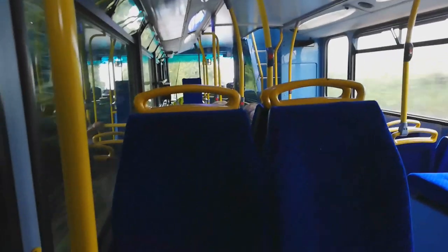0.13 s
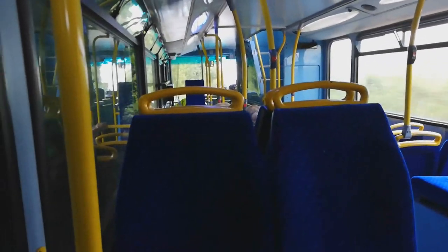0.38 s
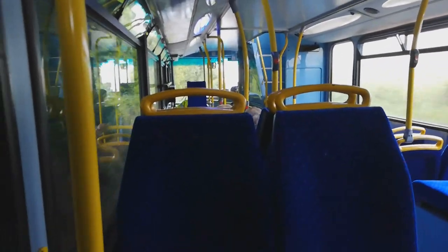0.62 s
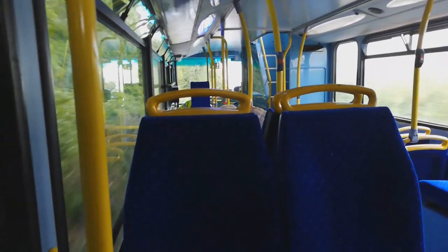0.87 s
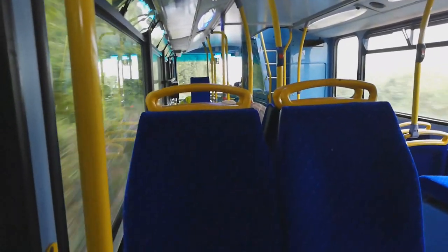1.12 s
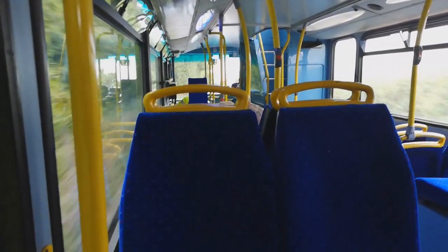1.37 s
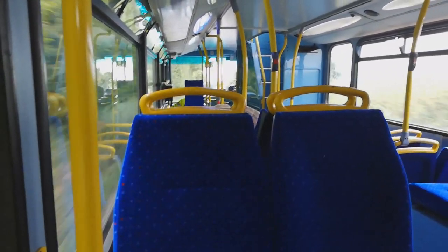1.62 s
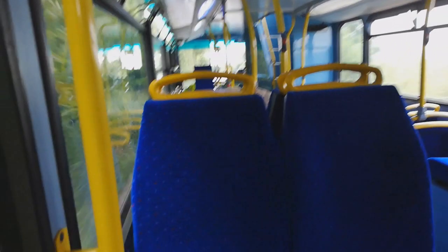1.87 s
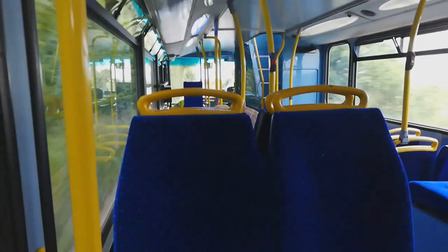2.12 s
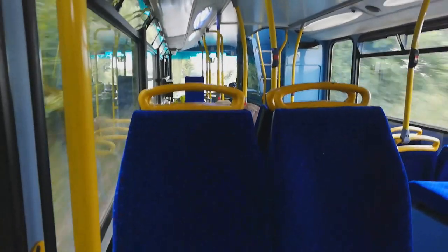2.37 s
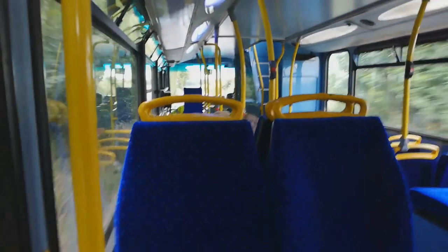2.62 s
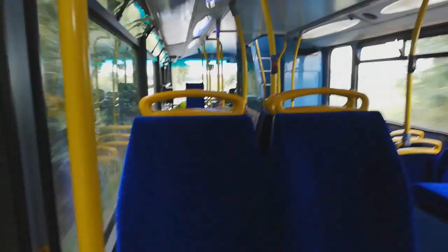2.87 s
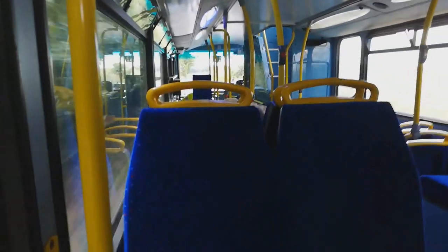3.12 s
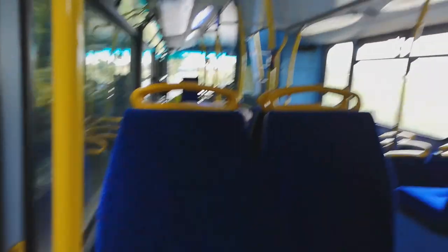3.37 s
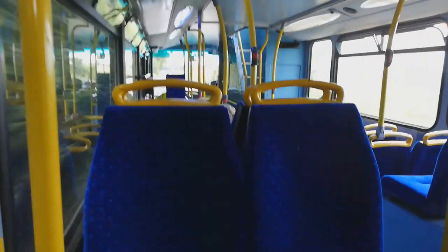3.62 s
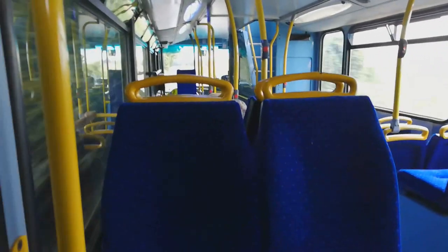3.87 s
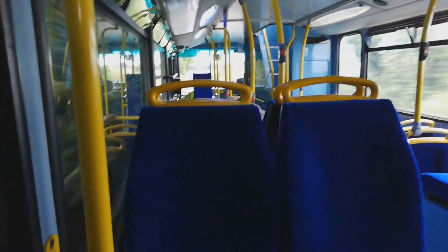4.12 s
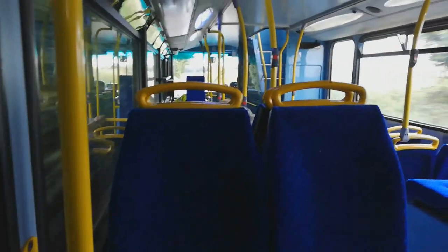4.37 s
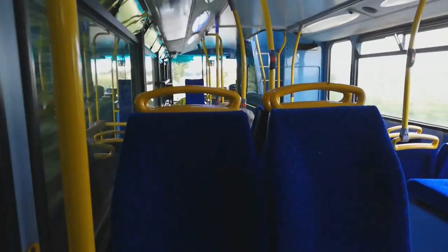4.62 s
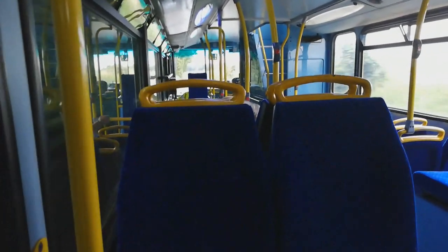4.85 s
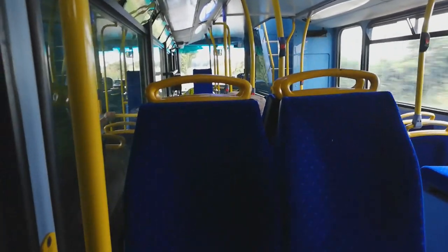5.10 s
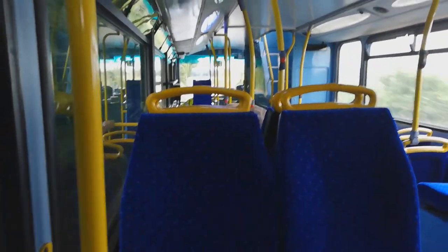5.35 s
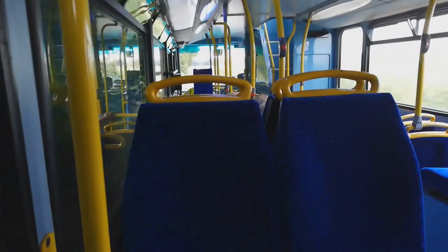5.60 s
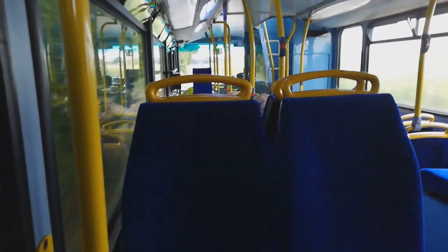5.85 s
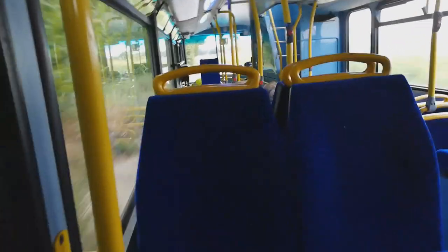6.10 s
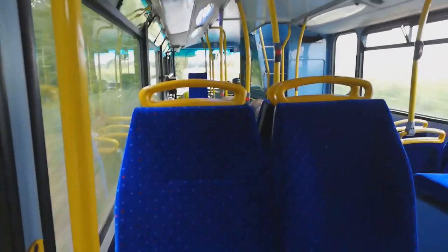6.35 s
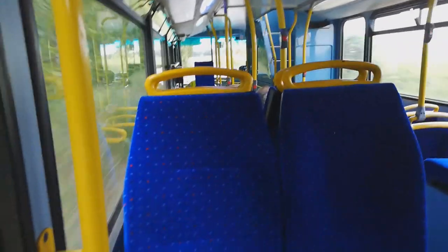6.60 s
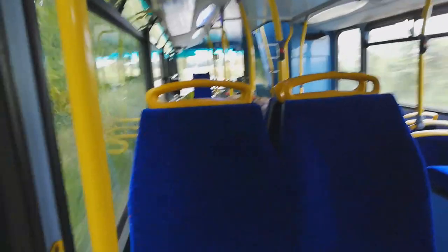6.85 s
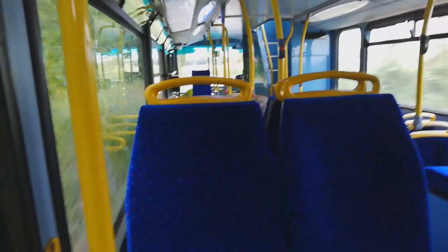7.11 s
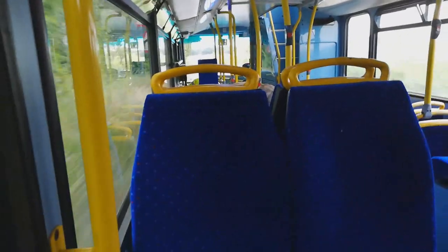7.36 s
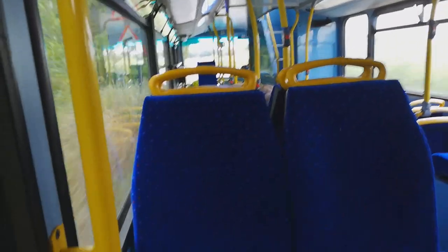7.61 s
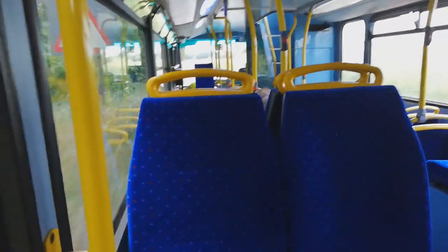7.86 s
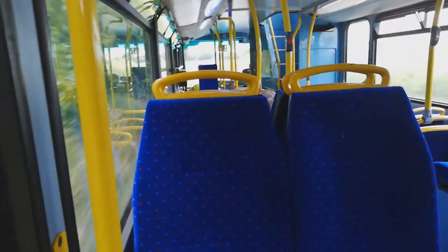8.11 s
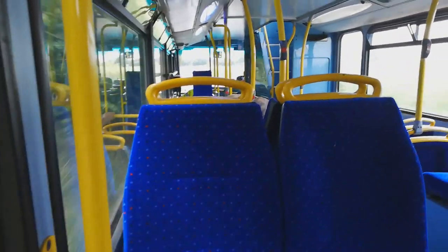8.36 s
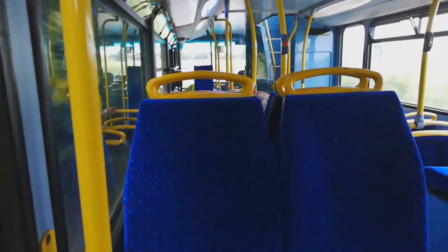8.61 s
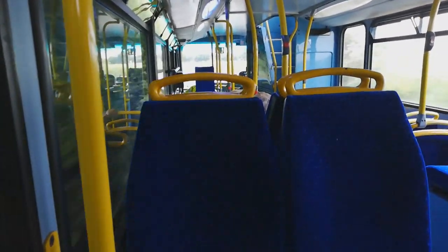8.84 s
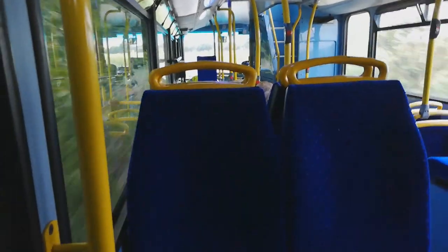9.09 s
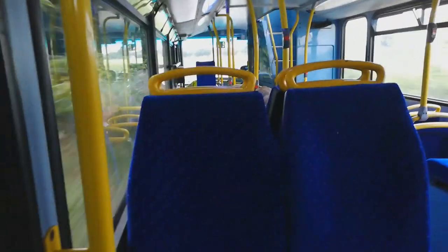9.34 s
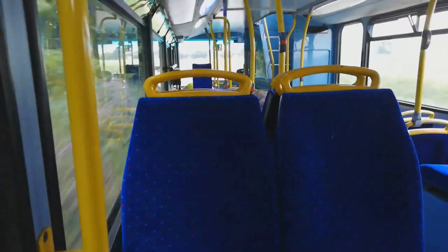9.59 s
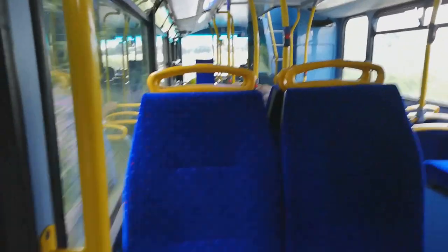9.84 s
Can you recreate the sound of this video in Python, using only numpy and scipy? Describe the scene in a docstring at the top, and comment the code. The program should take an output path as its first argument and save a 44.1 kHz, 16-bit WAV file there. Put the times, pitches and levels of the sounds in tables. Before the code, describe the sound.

Heard from a seat inside a bus at speed on a country road: deep engine drone, a fan hum and heavy low rumble dominate, with softer tyre roar and wind. Loose trim chatters in short dry spells, mostly on the right. Halfway, the engine eases off, bumps grow stronger, and a thin airy whistle opens near seven seconds and stays. Close stereo pickup.

```python
"""Bus interior at speed

Inside a bus on a country road, heard at two points a hand apart. Engine, gears and fan are sines on
multiples of their speeds, over shaped noise for body rumble, tyre roar and wind. Loose trim, as struck
ringing modes, chatters mostly on the right; brief noise bursts tick. Late on, noise through close
resonances whistles as an air leak and a narrow whirr comes up."""
import sys
import numpy as np
from scipy import signal
from scipy.io import wavfile
from scipy.ndimage import uniform_filter1d

SR = 44100
rng = np.random.default_rng(int(sys.argv[2]) if len(sys.argv) > 2 else 0)


def to_wav(s):
    """Save 16-bit WAV."""
    ch = np.atleast_2d(s).T  # columns
    pcm = np.round(np.clip(ch, -1, 1) * 32767)  # PCM
    wavfile.write(sys.argv[1], SR, pcm.astype(np.int16))


def how_loud(loudness_db):
    """Turn decibels into a plain amplitude multiplier (0 dB gives 1, 20 dB gives 10)."""
    steps = np.asarray(loudness_db, float) / 20
    return 10 ** steps


N = 439677
LOW_STEP = 10  # low sounds are made at a tenth of the sample rate

# likeness of left and right: f/Hz, likeness (0 to 1)
LIKENESS = [(100, 0.99), (230, 0.94), (300, 0.25), (600, 0.16), (1500, .25), (2300, 0.53), (4000, 0.29),
            (5000, 0.066), (6600, .3), (7500, .08)]
# bumps that shake the trim: t/s, initial drive level/dB
BUMPS = [(1.1832, -43), (1.6896, -44), (2.5925, -42), (3.3847, -41), (4.0377, -40), (5.6725, -35.5),
         (6.0831, -43), (6.1539, -34.5), (6.2243, -42), (6.6097, -37), (6.9277, -38), (7.0575, -35.5),
         (7.15, -38.5), (7.9478, -42), (8.116, -51), (8.4426, -39), (8.6242, -39), (8.6981, -43),
         (8.879, -39), (9.0648, -43), (9.3859, -43), (9.4574, -37), (9.5256, -40), (9.7477, -42)]


def evened(x):
    """Scales to rms 1."""
    return x / np.sqrt(np.mean(x ** 2) + 1e-20)


def times(step=1):
    """Time axis in s, one point every step samples."""
    return np.arange(0, N, step) / SR


def read(points, hz):
    """Interpolates table columns over log frequency."""
    f, *values = np.transpose(points)
    return np.array([np.interp(np.log(hz + 1), np.log(f + 1), v) for v in values])


def curves(rows, step=1):
    """Interpolates table columns over time."""
    s, *columns = np.transpose(rows)
    return [np.interp(times(step), s, c) for c in columns]


def drift(rate_hz, count, step=1):
    """Slow random curves of rms 1, one a row: sines up to rate_hz, weaker towards the top."""
    s = np.arange(N // 512 + 2) * 512 / SR
    f = np.geomspace(rate_hz / 10, rate_hz, 16)
    phase = 2 * np.pi * (f[:, None] * s + rng.random((count, 16, 1)))
    total = (np.sin(phase) / np.sqrt(f[:, None])).sum(1)
    return np.array([np.interp(times(step), s, evened(row)) for row in total])


def noise(spectrum, size, patchy_db, step=1):
    """Two-channel noise from random short-time spectra, patchy in time and pitch; mean of both has rms 1."""
    # phase between the sides: f/Hz, lead of left/rad
    left_lead = [(0, 0), (340, 0.0), (780, -5), (1380, -6), (3100, -12), (4050, -15), (5940, -18),
                 (7150, -11), (10500, -18.5), (12300, -14), (14300, -33), (15300, -33)]
    hz = np.fft.rfftfreq(size, step / SR)
    frames = N // step // (size // 4) + 5
    a, b, c, d, patches = rng.standard_normal((frames, len(hz), 5)).T
    patches = uniform_filter1d(patches, size=9, axis=0)
    patches = evened(uniform_filter1d(patches, size=9, axis=1))
    same = np.clip(read(LIKENESS, hz)[0], 0, 1)[:, None]
    turn = np.exp(-1j * np.interp(hz, *np.transpose(left_lead)))[:, None]
    left = a + 1j * b
    right = same * turn * left + np.sqrt(1 - same ** 2) * (c + 1j * d)
    z = np.array([left, right]) * how_loud(read(spectrum, hz)[:, :, None] + patchy_db * patches)
    pair = signal.istft(z, nperseg=size, noverlap=size - size // 4)[1][:, :len(times(step))]
    return pair / np.sqrt(np.mean(pair.mean(0) ** 2))


def orders(hz, multiples, levels, change_db):
    """Sines on multiples of a base rate; cabin reflections make them waver, unlike at each side."""
    turns, out = np.cumsum(hz) * LOW_STEP / SR, 0
    for k, (db, share, waver_db) in zip(multiples, levels):
        both, *sides = drift(1.5, count=3, step=LOW_STEP)
        apart = np.sqrt(1 - np.clip(read(LIKENESS, k * hz.mean())[0], 0, 1) ** 2)
        waver = (1 - apart) * both + apart * np.array(sides)
        # each side's phase wavers with the other side's level curve
        phase = 2 * np.pi * (k * turns + rng.random()) + 0.23 * waver_db * waver[::-1]
        level_db = db + share * change_db + waver_db * waver
        out = out + np.sqrt(2) * how_loud(level_db) * np.sin(phase)
    return out


def driveline():
    """Firing orders follow the load, gear teeth whine, and the fan keeps its own speed."""
    # t/s, engine firing rate/Hz, engine load/dB, fan tone/Hz, fan tone level/dB
    drive = [(0.0, 51.42, -2.5, 208.0, -20), (0.71, 50.92, -0.5, 208, -21.5),
             (1.42, 51.47, 2, 208.4, -20.5), (2.14, 52.04, 0, 207.8, -21), (2.85, 52.9, -1, 209.3, -20.5),
             (3.56, 54.1, -0.5, 210.1, -20.5), (4.35, 55.75, 0, 210.7, -22.5),
             (4.99, 56.55, -8.5, 213.7, -23), (5.7, 57, -10.5, 220.4, -26),
             (6.41, 56.36, -14.5, 219.5, -29), (7.12, 56.5, -18, 221, -29.5),
             (7.83, 56.65, -17, 223.3, -30.5), (8.55, 55.7, -15, 222.5, -29.5),
             (9.26, 54.6, -15.5, 221.3, -30.5), (9.97, 54.84, -10.5, 222.5, -29.5)]
    # multiples of the firing rate; one row each: rms level at 0 dB load/dB, share of load change, waver/dB
    engine_orders = (1, 2, 4.272, 6.43, 6.83, 21.4)
    engine_levels = [(-18.5, 0.85, 0), (-20, 0.66, .5), (-33.5, -0.056, 1), (-48, -0.13, 2.5),
                     (-49.5, -0.19, 2), (-54.5, 0.87, 3.5)]
    # multiples of the fan tone; one row each: level over first fan level/dB, share of its change, waver/dB
    fan_orders = (1, 1.372, 2, 2.72, 5.5)
    fan_levels = [(0, 0.96, 0.24), (-26, 0.54, 2), (-37.5, -0.67, 4), (-36, 0.3, 4), (-44, -0.8, 4)]
    # tooth-mesh multiples of the firing rate
    mesh_orders = (11.42, 12.81, 15.42, 16.43)
    # whines swell and fade gliding through cabin resonances: t/s, rms level of each mesh order/dB
    mesh_levels = [(0, -64, -56, -57, -42.5), (.7, -64, -48, -55, -46.5), (1.4, -60, -67, -58, -51),
                   (2.5, -60, -60, -46, -46), (3.5, -64, -48, -60, -50), (5, -61, -52, -63, -47),
                   (5.75, -62, -46.5, -63, -48), (6.2, -70, -52, -61, -62), (7.8, -52, -48, -67, -62),
                   (9.97, -50.5, -49.5, -64, -54)]
    firing_hz, load_db, fan_hz, fan_db = curves(drive, LOW_STEP)
    engine = orders(firing_hz, engine_orders, engine_levels, load_db)
    fan = how_loud(fan_db[0]) * orders(fan_hz, fan_orders, fan_levels, fan_db - fan_db[0])
    gears = sum(orders(firing_hz, [k], [(0, 1, 2.9)], db)
                for k, db in zip(mesh_orders, curves(mesh_levels, LOW_STEP)))
    return engine + fan + gears


def turbo():
    """A faint thin whine: one sine with trembling pitch and unsteady level at each side."""
    # t/s, f/Hz, level/dB
    whine = [(0, 9720, -54), (.2, 9720, -63), (.3, 9220, -85), (.6, 9100, -70), (2, 9060, -65),
             (3, 9210, -63), (4, 9300, -64), (4.6, 9300, -80)]
    hz, db = curves(whine)
    tremble_hz = 12 * drift(30, count=1)
    return how_loud(db + 3.3 * drift(6, count=2)) * np.sin(2 * np.pi * np.cumsum(hz + tremble_hz) / SR)


def body():
    """The road shakes the springs, a cabin resonance and the floor panels: three low noises."""
    # t/s, body heave/dB, cabin boom/dB, rumble/dB
    road = [(0, -16.5, -22, -22), (.5, -17.5, -21, -22.5), (2, -24.5, -18.5, -21), (4.4, -22.5, -20, -22),
            (5.1, -21.5, -21, -20.5), (5.5, -20.5, -30, -22), (6, -13.5, -26, -21.5),
            (6.6, -18, -20.5, -20.5), (7.3, -21, -24.5, -22.5), (7.8, -21.5, -30, -24.5),
            (9, -22.5, -30.5, -22.5), (9.97, -19.5, -33, -23)]
    # noise spectra: f/Hz, relative level/dB
    heave_spectrum = [(3, -35), (7, -17), (12, -0.5), (18, -5), (26, -6), (38, -10.5), (50, -10), (65, -50),
                      (120, -130)]
    boom_spectrum = [(40, -51), (62, -15.5), (76, -8), (81, 3), (86, -7), (98, -14), (130, -50),
                     (200, -130)]
    rumble_spectrum = [(30, -27), (60, -3.5), (105, 2), (130, -3), (158, 0), (184, -9), (205, 1),
                       (235, -6.5), (252, -9), (272, -24.5), (330, -57), (500, -130)]
    # the uneven road makes the three come and go: heave/dB, boom/dB, rumble/dB
    lurch_depth_db = (2, 2, 0.93)
    lurch_db = np.array(lurch_depth_db)[:, None] * drift(4, count=3, step=LOW_STEP)
    heave_db, boom_db, rumble_db = curves(road, LOW_STEP) + lurch_db
    heave = how_loud(heave_db) * noise(heave_spectrum, size=2048, patchy_db=1.0, step=LOW_STEP)
    boom = how_loud(boom_db) * noise(boom_spectrum, size=2048, patchy_db=1.7, step=LOW_STEP)
    rumble = how_loud(rumble_db) * noise(rumble_spectrum, size=1024, patchy_db=1.22, step=LOW_STEP)
    return heave + boom + rumble


def tyres_and_wind():
    """Tyre roar, roadside hiss and wind: broad noises coloured differently at each side."""
    # t/s, tyre roar/dB, hiss thrown back by the roadside/dB, wind at the glass/dB
    air = [(0, -37, -44.5, -51.5), (1.2, -37, -45, -52.5), (2.7, -36, -45, -52.5), (4, -35.5, -43.5, -51),
           (4.55, -36, -44.5, -52), (4.68, -34.5, -39.5, -52), (5.1, -34, -41.5, -52.5),
           (5.38, -34.5, -43.5, -52.5), (5.52, -32, -39, -49.5), (5.78, -33.5, -43, -49.5),
           (5.9, -36, -44, -53), (6.4, -35.5, -46, -52.5), (6.75, -34, -43, -52), (7, -34.5, -45.5, -50),
           (7.6, -34, -46, -51), (8.75, -33.5, -45, -48.5), (9.6, -33.5, -45.5, -50),
           (9.97, -34.5, -46.5, -51.5)]
    # noise spectra: f/Hz, left relative level/dB, right relative level/dB
    roar_spectrum = [(150, -48, -49), (215, -1, -4), (298, 3, 4), (349, 3.5, 4), (453, -5, -1),
                     (844, -1.5, 0), (1253, -6, -3), (1700, -12, -9), (2200, -14.5, -9.5), (3340, -23, -18),
                     (4300, -21.5, -19.5), (5380, -23.5, -26), (6260, -34, -28.5), (9000, -70, -69)]
    roadside_spectrum = [(1300, -52, -42), (2066, -7, -2), (2860, -13.5, -1.5), (3260, -13, -1),
                         (3720, -21, -8), (4160, -34, -31), (6000, -86, -80)]
    wind_spectrum = [(3480, -34, -35), (5140, -17.5, -10), (6330, -1.5, -7.5), (7730, -2, 2.5),
                     (9300, -0.5, -1.5), (10500, -7, -15.5), (12500, -19.5, -20), (15000, -29, -29),
                     (17000, -50, -51)]
    gust_db = 0.77 * drift(6, count=1)  # shared by all three
    roar_db, roadside_db, wind_db = curves(air) + gust_db
    roar = how_loud(roar_db) * noise(roar_spectrum, size=2048, patchy_db=1.07)
    roadside = how_loud(roadside_db) * noise(roadside_spectrum, size=1024, patchy_db=1.0)
    wind = how_loud(wind_db) * noise(wind_spectrum, size=1024, patchy_db=1.5)
    return roar + roadside + wind


def shaking():
    """How hard the trim is driven: dying jolts after bumps, and a buzz that comes in spells."""
    # faint buzz between spells: t/s, drive level/dB
    faint_buzz = [(0, -52), (1.3, -45.5), (4.45, -49), (4.7, -63), (5.5, -53), (6.9, -53), (7.4, -44),
                  (9.97, -47)]
    # unbroken buzzing: start/s, length/s, drive level at start/dB
    spells = [(.47, 0.36, -43), (0.916, 0.068, -41), (1.1, .13, -40), (1.93, .22, -38), (2.4, 0.24, -40.5),
              (2.73, .19, -40.5), (3.09, 0.052, -41), (3.28, 0.23, -40.5), (3.63, 0.38, -42.5),
              (4.04, 0.44, -43), (5.64, .11, -39.5), (6.153, .11, -39.5), (6.33, .07, -38),
              (6.62, 0.13, -37.5), (6.93, .18, -40.5), (7.15, .13, -40), (7.92, .1, -44), (8.12, .1, -40.5),
              (8.328, .16, -41), (8.563, .22, -40), (8.88, .07, -39), (9.13, 0.106, -36.5),
              (9.38, 0.29, -40.5)]
    bump_t60_s, edge_s, sag_db = 0.34, 0.03, -2  # a spell weakens by the sag from start to end
    t, jolt = times(), np.zeros(N)
    when, size = rng.random((24, 2)).T  # small bumps at random moments
    small_bumps = zip(when * t[-1], -52.5 + 5 * size)
    for s, db in [*BUMPS, *small_bumps]:
        at = slice(round(s * SR), round((s + bump_t60_s) * SR))
        jolt[at] = np.maximum(jolt[at], how_loud(db - 60 * (t[at] - s) / bump_t60_s))
    buzz = how_loud(curves(faint_buzz)[0])
    for s, length, db in spells:
        at = slice(round((s - edge_s) * SR), round((s + length + edge_s) * SR))
        inside = np.minimum(t[at] - s, s + length - t[at]) / edge_s + 1
        spell = how_loud(db + sag_db * (t[at] - s) / length) * np.clip(inside, 0, 1) ** 2
        buzz[at] = np.maximum(buzz[at], spell)
    flutter_db = 1.5 * drift(10, count=1)[0]
    return jolt, buzz * how_loud(flutter_db)


def trim():
    """A loose panel knocks on its frame and rings; only jolts after bumps reach its high modes."""
    # ringing modes: f/Hz, left level/dB, right level/dB, t60/s
    modes = [(3260, -17, -13, .015), (3590, -16, -2, 0.018), (3758, -14, -1, 0.025),
             (4018, -18, -2.5, 0.029), (4142, -15, -3.5, 0.024), (4480, -19, -6, 0.016),
             (5611, -2.5, -4.5, 0.016), (5840, -1, -4, 0.015), (7870, -6, -8, 0.015),
             (8900, -13, -11, .012), (10430, -4, -16, .01), (12800, -18, -15, .008),
             (14200, -21, -16, .008)]
    knocks_per_s, hard_blow_hz = 900, 5000
    soft_start_s = 0.002  # a cushioned blow keeps each ring narrow
    jolt, buzz = shaking()
    knocks = rng.random(N) < knocks_per_s / SR
    knocks[[round(s * SR) for s, _ in BUMPS]] = True
    out, blows, t = 0, np.zeros((2, N)), times()[:1200]
    onset = np.sin(np.pi / 2 * np.minimum(t / soft_start_s, 1)) ** 2
    for hz, left_db, right_db, t60_s in modes:
        shake = jolt if hz > hard_blow_hz else np.hypot(buzz, 1.27 * jolt)
        # each mode is struck unevenly
        blows[:, knocks] = shake[knocks] * rng.standard_normal((knocks.sum(), 2)).T
        ring = how_loud(-60 * t / t60_s) * np.sin(2 * np.pi * hz * t) * onset
        ringing = signal.oaconvolve(blows, ring[None], axes=1)[:, :N]
        out = out + how_loud(np.array([[left_db], [right_db]])) * ringing
    return out


def ticks():
    """Short bright noise bursts, ticks and swishes, that the cabin prolongs."""
    # t/s, peak of envelope/dB, left over right/dB, rise/s, t60/s, sizzle over tick/dB
    bursts = [(.1, -51.5, -3, .02, .2, -20), (.67, -51, -2, .005, .12, -22),
              (1.889, -46.5, 1, .004, 0.14, -28), (1.931, -36, 1, .003, 0.074, -6),
              (1.947, -49.5, -2, 0.0037, .25, -13), (5.8, -45, -1, 0.047, 0.42, -19),
              (7.785, -44, -3, .01, .2, -21)]
    # noise spectra: f/Hz, relative level/dB
    tick_spectrum = [(3000, -24), (5500, -14), (7800, -1), (9400, 1), (10800, -10), (13000, -37)]
    sizzle_spectrum = [(9000, -34), (11000, -2), (13000, -4), (15500, -4)]
    t, swell, sizzle = times(), np.zeros((2, N)), np.zeros((2, N))
    for s, db, pan_db, rise_s, t60_s, sizzle_db in bursts:
        decay_db = -60 * np.maximum(t - s - rise_s, 0) / t60_s
        shape = np.clip((t - s) / rise_s, 0, 1) * how_loud(db + decay_db)
        shape = shape * how_loud(np.array([[pan_db / 2], [-pan_db / 2]]))
        swell += shape
        sizzle += how_loud(sizzle_db) * shape
    bright = swell * noise(tick_spectrum, size=256, patchy_db=2.0)
    return bright + sizzle * noise(sizzle_spectrum, size=256, patchy_db=1.5)


def leak():
    """Turbulent air through a slit excites a cluster of close resonances."""
    # silent before the first row: t/s, level/dB
    leak_levels = [(6.92, -52), (7.03, -37), (7.12, -39.5), (7.39, -36), (7.62, -40.5), (8.2, -41.5),
                   (9.97, -43)]
    # f/Hz, width setting the ring's decay/Hz, relative level/dB
    leak_modes = [(6530, 220, -2.5), (6590, 146, 3.5), (6830, 260, 0), (7080, 410, -6.5)]
    t, ring = np.arange(1500) / SR, 0
    for hz, width_hz, db in leak_modes:
        decay = np.pi * width_hz * t
        ring = ring + how_loud(db) * width_hz * np.exp(-decay) * decay ** 2 * np.cos(2 * np.pi * hz * t)
    shared, *sides = rng.standard_normal((3, N))
    jet = 0.32 * shared + np.array(sides)
    whistle = evened(signal.oaconvolve(jet, ring[None], axes=1)[:, :N])
    opened = times() > leak_levels[0][0]
    flutter_db = 0.96 * drift(25, count=1)
    return opened * how_loud(curves(leak_levels)[0] + flutter_db) * whistle


def whirr():
    """A narrow band of noise, stronger on the right, that comes up late."""
    # f/Hz, left relative level/dB, right relative level/dB
    whirr_spectrum = [(1900, -70, -62), (2110, -21, -11), (2140, -9, 4), (2200, -23, -13), (2400, -69, -62)]
    # t/s, level/dB
    whirr_levels = [(0, -73), (7.3, -72), (7.8, -56.5), (9, -56), (9.97, -57)]
    return how_loud(curves(whirr_levels)[0]) * noise(whirr_spectrum, size=2048, patchy_db=0.5)


def scene():
    """Sums all sources; the low ones are first brought up to the full sample rate."""
    low = driveline() + body()
    low = signal.resample_poly(low, LOW_STEP, 1, axis=1, window=("kaiser", 12))[:, :N]
    return low + turbo() + tyres_and_wind() + trim() + ticks() + leak() + whirr()


def top_cut(x):
    """Nothing passes above the cut-off."""
    return signal.sosfilt(signal.butter(12, 15740, fs=SR, output="sos"), x)


def record(dry):
    """Gain control turns the whole mix down on its loudest swings, mostly bass."""
    power = uniform_filter1d((dry ** 2).mean(0), size=1800)
    power_db = 10 * np.log10(abs(power) + 1e-12)
    over_db = uniform_filter1d(np.maximum(power_db + 14.0, 0), size=900)  # threshold -14 dB
    mix = dry * how_loud(0.82 - 0.48 * over_db)
    return top_cut(mix)


dry = scene()
out = record(dry)
to_wav(out)
```